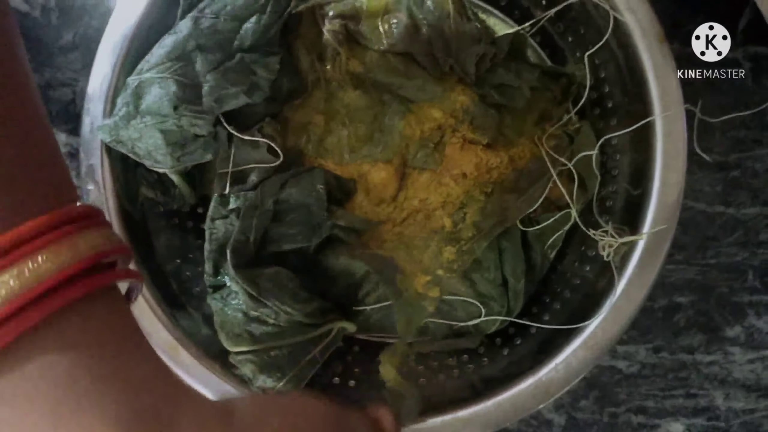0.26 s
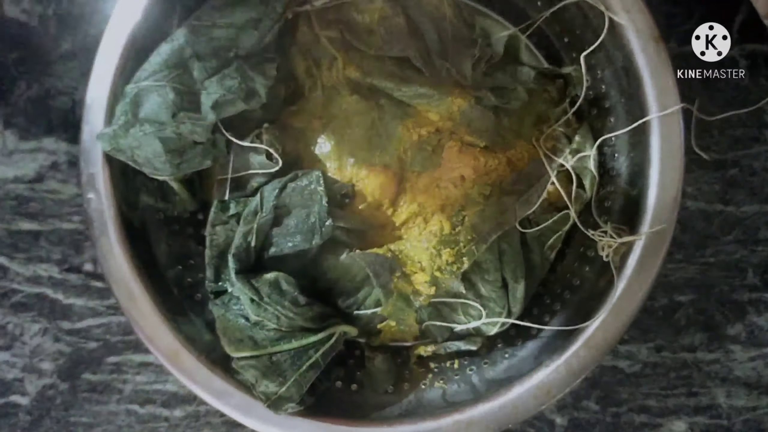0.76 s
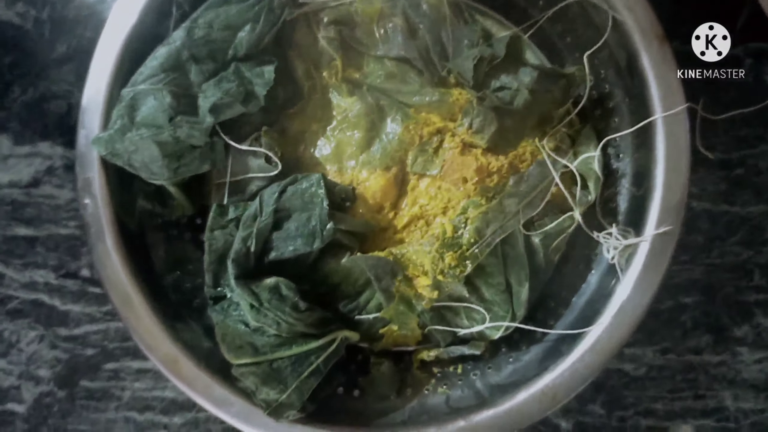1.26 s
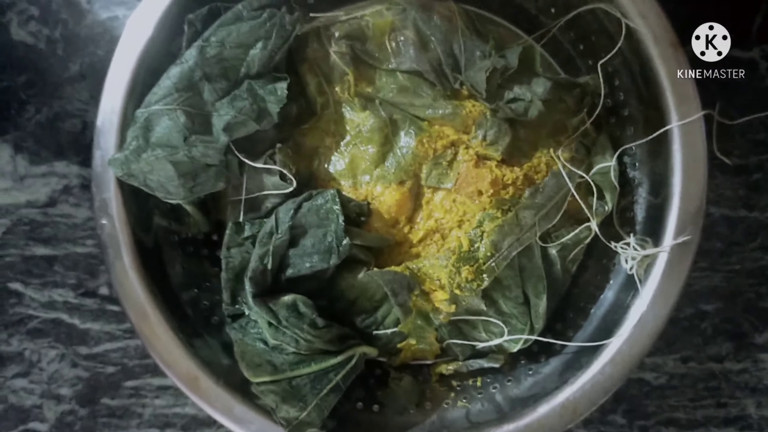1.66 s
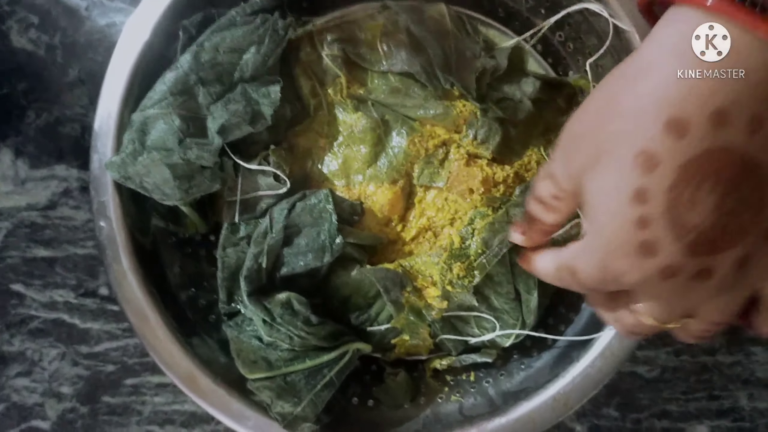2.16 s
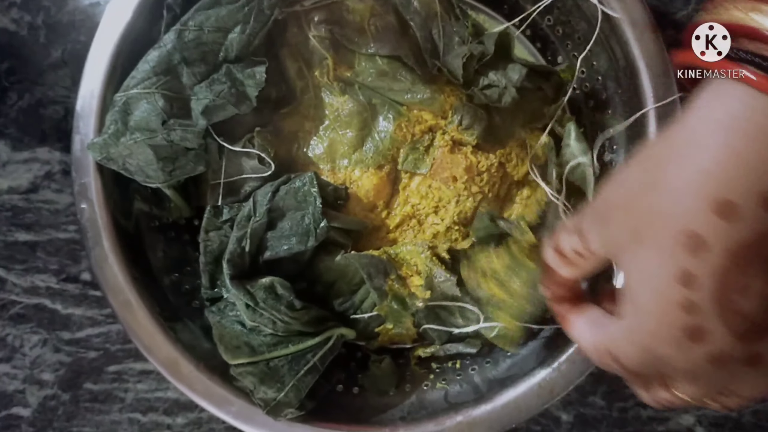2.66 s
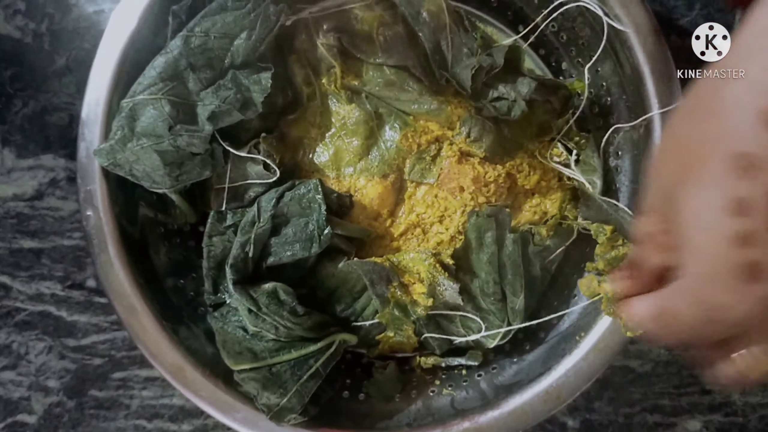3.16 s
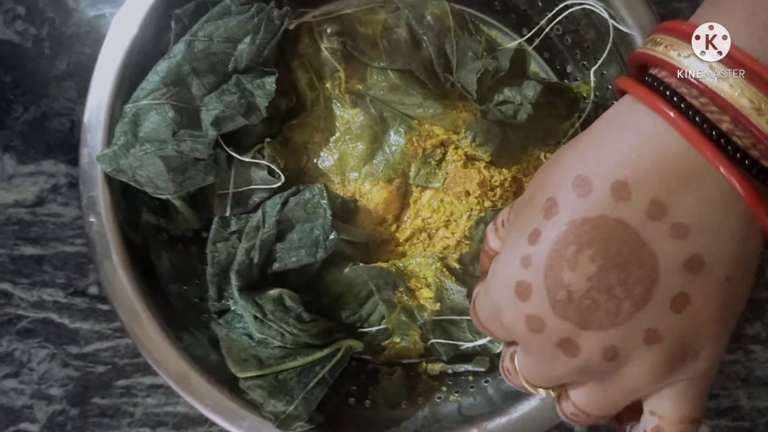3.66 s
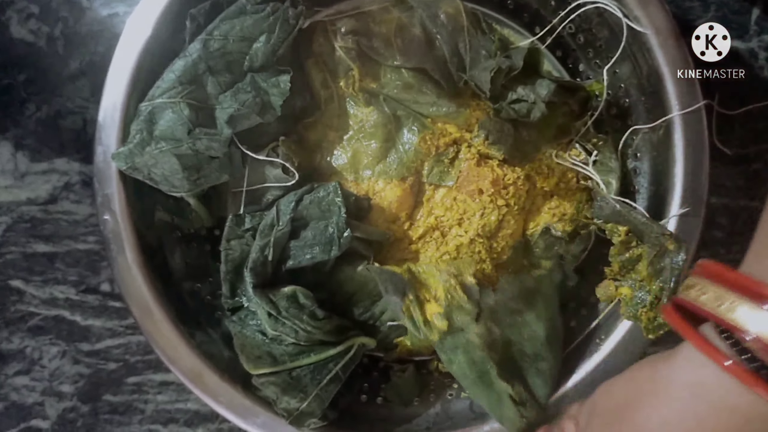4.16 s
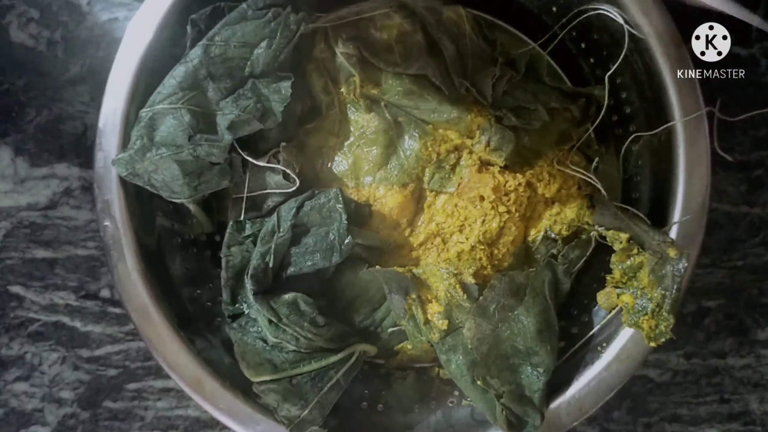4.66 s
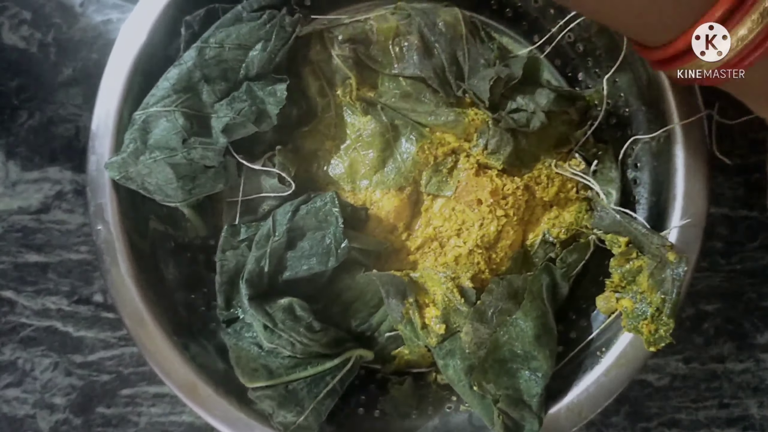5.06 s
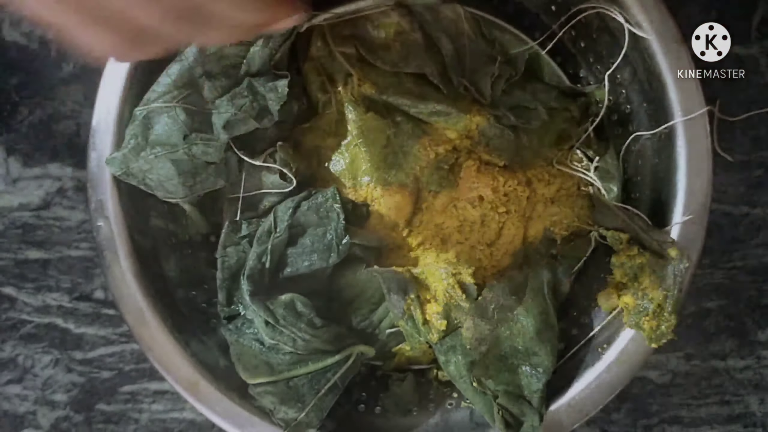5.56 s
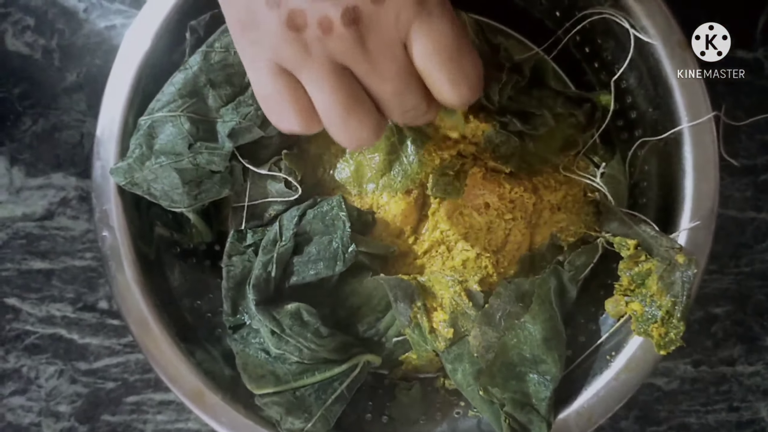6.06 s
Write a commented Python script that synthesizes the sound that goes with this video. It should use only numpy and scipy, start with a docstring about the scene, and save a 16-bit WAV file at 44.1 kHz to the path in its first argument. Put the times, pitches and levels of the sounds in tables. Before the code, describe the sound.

Close by in a quiet kitchen, a hand peels limp wet leaves with soft, jerky rustles and tiny sticky ticks. Thin metal bangles ping, clink and rub at the wrist in bunches, around two seconds and again past four and a half, then clatter hardest at five. A far bird whistles faintly over a low hum and steady low background noise.

```python
"""A quiet kitchen, where a hand peels wet steamed leaves back in a steel colander.
Wrist bangles clink, ping and clack as struck modes and short bursts; they rub as grains feeding damped modes,
and slide along the arm as swelling noise. The leaves rustle and tick in coloured grains and filtered bursts.
A low hum of four wavering tones, a steady noise floor and a far bird's gliding, echoing whistles lie behind."""
import sys
import numpy as np
from scipy import signal
from scipy.fft import rfft, irfft
from scipy.io import wavfile

SR = 44100
rng = np.random.default_rng(int(sys.argv[2]) if len(sys.argv) > 2 else 0)


def bounce(signal):
    """Save signal as a 16-bit WAV file at the path given by the first command-line argument."""
    frames = np.transpose(np.atleast_2d(signal))
    limited = np.clip(frames, -1, 1)
    pcm = np.round(limited * 32767).astype(np.int16)
    wavfile.write(sys.argv[1], SR, pcm)


N = 278712
TIME = np.arange(N) / SR  # seconds


# Bangles touch: (time [s], ring level before mode trims [dB], high over low modes [dB], contact tick level [dB])
BANGLE_TOUCHES = [(1.1942, -65, 1, -82), (1.3452, -54.5, 19, -48), (1.683, -60.5, 16, -80),
                  (1.7852, -44, 7, -52), (1.7917, -44, 12, -53), (1.8105, -52, 10, -65),
                  (1.8309, -47.5, 25.5, -41.5), (2.0379, -46, 16, -41.5), (2.0587, -65, 32, -44),
                  (2.118, -62, 18, -70), (2.135, -62.5, -4, -58), (2.178, -59.5, 28, -73),
                  (2.9605, -57, 8, -58), (3.2244, -60.5, 14, -79), (4.0532, -66, 2, -56),
                  (4.1728, -60.5, 13, -57), (4.5128, -51.5, 21, -82), (4.6178, -43.5, 18, -47),
                  (4.6375, -53, 13, -39), (4.6533, -51, 28, -51), (4.7492, -54.5, 40.5, -50),
                  (4.8461, -61.5, 13, -48.5)]
# Modes of the bangle stack before damping: (frequency [Hz], relative level [dB], free t60 [s])
STACK_MODES = [(1620, -5, .2), (1920, -5, .12), (2250, -9, .06), (2620, -9, .06), (4575, -2, .16),
               (5520, -2, .16), (8400, -13, .06), (8740, -4, .14), (10545, -1, .13), (10655, -8, .22),
               (12100, -16, .07), (13730, -13, .1), (13975, 0, .13), (14060, -5, .1), (14340, -9, .07),
               (14790, -12, .12)]
# Colour of the contact tick: (frequency [Hz], level [dB])
TICK_COLOUR = [(800, -44), (2000, 10.5), (3000, 5), (6500, -6), (8300, 10.5), (12000, 10.5), (15000, -29),
               (16500, -28)]


def clinks(body_db=-1.0, low_db=0.5, middle_db=3.5, tick_t60=0.033, scatter_db=5.0, grip=0.49):
    """Each touch and its rebound ring the stack, damped by the wrist; brightness tilts high against low modes."""
    rebound_s, rebound_loss_db = 0.011, 4.5
    rings, ticks = np.zeros(N), np.zeros(N)
    for s, level, bright, tick in BANGLE_TOUCHES:
        # trims for modes below 4 kHz, 4-7 kHz, 7-12 kHz and above
        group_db = [body_db - bright / 2, low_db - bright / 2, middle_db, bright / 2]
        for delay, loss in (0, 0), (rebound_s, rebound_loss_db):
            for hz, db, t60 in STACK_MODES:
                group = np.searchsorted([4000, 7000, 12000], hz)
                strength = level - loss + group_db[group] + db
                scattered = strength + scatter_db * rng.normal()
                detune = 1 + 0.0026 * rng.normal()  # each mode's pitch varies slightly from touch to touch
                add(rings, s + delay, from_db(scattered) * ring(hz * detune, t60 * grip))
            add(ticks, s + delay, from_db(tick - loss) * burst(tick_t60))
    return rings + coloured(ticks, TICK_COLOUR)


# A thin bangle rings: (time [s], pitch [Hz], level before mode levels [dB], lowest mode level [dB])
THIN_BANGLE_PINGS = [(0.775, 10380, -30.5, -62), (2.049, 9600, -41, -81), (2.060, 9480, -28.5, -77),
                     (3.310, 9394, -40, -70), (3.322, 9420, -31, -51), (4.541, 9640, -22.5, -67)]
# Its upper modes: (multiple of the pitch [ratio], relative level [dB], t60 [s])
THIN_BANGLE_MODES = [(0.996, -5.5, 0.046), (1.002, -44.5, 0.4), (1.599, -10, 0.076)]


def pings(level_db=0.0, lowest_t60=0.1):
    """A thin bangle swings clear of the skin and rings freely in a few decaying modes."""
    out = np.zeros(N)
    for s, pitch, peak, lowest in THIN_BANGLE_PINGS:
        add(out, s, from_db(lowest) * ring(pitch * .528, lowest_t60))
        for multiple, db, t60 in THIN_BANGLE_MODES:
            add(out, s, from_db(peak + db + level_db) * ring(pitch * multiple, t60))
    return out


# Bangles knocked hard: (time [s], crack level before trim [dB], knock level before trim [dB], crack t60 [s])
BANGLE_CLACKS = [(0.774, -37, -53.5, 0.06), (1.3448, -29.5, -41, 0.039), (1.5276, -40.5, -49.5, 0.015),
                 (1.8306, -22, -63, 0.012), (2.057, -23, -56.5, 0.012), (3.312, -38, -55, 0.019),
                 (3.321, -35.5, -49, 0.027), (4.295, -24, -39, 0.014), (4.54, -31, -51, 0.016),
                 (4.9841, -14.5, -31.5, 0.015), (4.995, -10, -30, 0.018), (5.0086, -11, -35.5, 0.006),
                 (5.1065, -17, -43, 0.018), (5.1207, -22, -50, 0.024), (5.1263, -17.5, -29.5, 0.027)]
# Colour of the dry crack: (frequency [Hz], level [dB])
CRACK_COLOUR = [(2500, -22), (4000, -10), (5700, -3), (6800, -4), (8200, 0), (9500, -4), (12500, -6),
                (15000, -2), (16500, -10)]
# Colour of the low knock: (frequency [Hz], level [dB])
KNOCK_COLOUR = [(150, -40), (450, -18), (700, -19), (1500, -15.5), (2200, -1), (3000, -4.5), (4000, -10),
                (8000, -48)]


def clacks(crack_db=-11.0, knock_db=-1.0, knock_t60=0.025, impact=1.0):
    """Bangles pressed together cannot ring: a dry crack over a short knock."""
    cracks, knocks = np.zeros(N), np.zeros(N)
    for s, peak, knock, length in BANGLE_CLACKS:
        crack_gain = from_db(peak + crack_db)
        add(cracks, s, crack_gain * burst(length))
        add(cracks, s, crack_gain * np.array([impact]))  # the instant of first contact
        add(knocks, s, from_db(knock + knock_db) * burst(knock_t60))
    return coloured(cracks, CRACK_COLOUR) + coloured(knocks, KNOCK_COLOUR)


# Bangles rub as the wrist turns: (peak time [s], level before mix trims [dB], 20 dB rise [s], 20 dB fall [s])
WRIST_TURNS = [(1.32, -55, 0.085, 0.045), (1.695, -47, 0.066, 0.092), (1.795, -34, 0.055, 0.049),
               (2.04, -43.5, 0.093, 0.049), (2.2, -47.5, 0.097, 0.11), (2.445, -52, .04, 0.075),
               (2.705, -59, .03, 0.029), (2.98, -51.5, 0.035, 0.024), (3.15, -56, .02, .05),
               (3.26, -54.5, .07, 0.16), (3.42, -57.5, .02, 0.072), (3.86, -60, .08, 0.06),
               (4.52, -53, .04, .04), (4.765, -51.5, 0.017, 0.035), (4.89, -58, 0.12, 0.15)]
# Colour of the rubbing contacts: (frequency [Hz], level [dB])
RUB_COLOUR = [(1500, -16.5), (2600, -16), (4500, -13.5), (5600, -20.5), (8700, -3.5), (10500, -15.5),
              (13200, -2), (13900, 1.5), (14500, 5.5), (15400, 0.5)]


def rubbing(ring_db=-4.0, scratch_db=-21.5, catch_db=-2.5, shift_db=2.5):
    """Rubbing rims feed tiny contacts and rarer catches into damped modes, which shift as the contact moves."""
    stream = grains(per_s=1500, spread_db=3)
    catches = grains(per_s=200, spread_db=2.5)
    friction = stream + from_db(catch_db) * catches
    contacts = coloured(swells(WRIST_TURNS) * friction, RUB_COLOUR)
    # tightly damped, each mode decays three times sooner
    modes = [from_db(db) * ring(hz, t60 / 3) for hz, db, t60 in STACK_MODES]
    rings = np.zeros(N)
    for mode in modes:
        shift = from_db(shift_db * drift(per_s=30))
        rings += shift * signal.oaconvolve(contacts, mode)[:N]
    rings /= np.linalg.norm(modes)
    return from_db(ring_db) * rings + from_db(scratch_db) * contacts


# The stack slips along the forearm: (peak time [s], level [dB], 20 dB rise [s], 20 dB fall [s])
FOREARM_SLIPS = [(4.997, -42, 0.0068, 0.026), (5.078, -37.5, 0.0033, 0.0057), (5.128, -44, 0.085, 0.12)]
# Skin hisses under the last slip: (peak time [s], level [dB], 20 dB rise [s], 20 dB fall [s])
SKIN_HISS = [(5.136, -49, 0.035, 0.3)]
# Colour of the hollow swish: (frequency [Hz], level [dB])
SWISH_COLOUR = [(240, -29), (400, -14), (469, -27), (689, -1), (1210, 1), (1290, 0), (1390, 1), (1910, -10),
                (2420, 1), (6000, -58), (7800, -40), (13200, -120)]
# Colour of the skin hiss: (frequency [Hz], level [dB])
HISS_COLOUR = [(1760, -18), (3000, -6.5), (6090, -21.5), (6810, -36), (8340, -14), (11700, -16),
               (14900, -14), (16000, -11)]


def sliding():
    """The stack slips along the arm: swelling noise makes a hollow swish and a fading hiss."""
    swish = swells(FOREARM_SLIPS) * noise(SWISH_COLOUR)
    hiss = swells(SKIN_HISS) * noise(HISS_COLOUR)
    return swish + hiss


# Short rustling strokes of the hand and arm, most of them pulling at a leaf:
# (peak time [s], base rustle level [dB], 20 dB rise [s], 20 dB fall [s], wet crackle over base rustle [dB])
RUSTLE_STROKES = [(0.0, -59.5, .1, 0.22, -5), (0.55, -70.5, 1.3, 1, -26), (1.41, -70, 0.11, 0.8, -12),
                  (1.95, -71.5, 1.3, 0.99, 0), (2.66, -63.5, 0.52, 0.41, -8.5), (2.97, -66, 0.41, 0.11, 0),
                  (3.61, -63, 0.36, 0.46, -3.5), (3.9, -61, .35, .12, -8), (3.999, -61, 0.034, 0.25, 0.5),
                  (4.72, -65.5, 0.39, 0.91, 6), (5.31, -59.5, 0.2, 0.21, -3), (6.12, -70.5, 0.22, 1, 3)]
# A sticky leaf lets go: (time [s], level before band filter [dB], frequency that places the band [Hz])
STICKY_TICKS = [(1.408, -44, 2210), (2.022, -38, 8800), (2.473, -48, 8800), (4.055, -38.5, 5800),
                (4.23, -47, 3500), (5.944, -49.5, 6500), (6.013, -46.5, 8200), (6.071, -40, 5940),
                (6.099, -41.5, 4300), (6.195, -43, 7960), (6.22, -42.5, 5500)]
# Colour of the dragging leaves: (frequency [Hz], level [dB])
RUSTLE_COLOUR = [(240, -32.5), (400, -6.5), (469, -6.5), (754, -14.5), (1150, -5), (2260, 0), (2420, 1),
                 (3330, -12), (4730, -17), (6000, -43), (7800, -48), (13200, -120)]
# Colour of the breaking wet films: (frequency [Hz], level [dB])
CRACKLE_COLOUR = [(1500, -29), (3500, -6.5), (8000, -1.5), (15000, -1.5)]


def leaves(tug_db=-2.5, tug_s=0.049, snap_db=-9.0, snaps_per_s=40, jerk_db=1.5, tick_t60=0.01):
    """Limp leaves rustle in little jerks, each stroke with a short peak; wet films break in ticks and rarer snaps."""
    strokes = swells([(s, db, rise, fall) for s, db, rise, fall, wet in RUSTLE_STROKES])
    peaks = swells([(s, db + tug_db, tug_s, tug_s) for s, db, rise, fall, wet in RUSTLE_STROKES])
    wetness = swells([(s, db + wet, rise, fall) for s, db, rise, fall, wet in RUSTLE_STROKES])
    jerks = from_db(jerk_db * drift(per_s=35))
    drag = np.hypot(strokes, peaks) * jerks
    fibres = grains(per_s=900, spread_db=3.5)
    films = grains(per_s=3500, spread_db=3)
    snaps = from_db(snap_db) * grains(per_s=snaps_per_s, spread_db=4.5)
    rustle = coloured(drag * fibres, RUSTLE_COLOUR)
    crackle = coloured(wetness * (films + snaps), CRACKLE_COLOUR)
    out = rustle + crackle
    for s, peak, hz in STICKY_TICKS:
        band = signal.butter(1, [hz / 2, min(hz * 1.6, SR * .4)], "band", fs=SR)
        add(out, s, from_db(peak) * signal.lfilter(*band, burst(tick_t60)))
    return out


# Swell of the low hum, used relative to its mean: (time [s], level [dB])
HUM_SWELL = [(0, -52.5), (.1, -48.5), (.52, -71), (.8, -57.5), (1.3, -71.5), (1.65, -62.5), (2.3, -67),
             (3.1, -73.5), (6.32, -81.5)]
# Tones of the hum: (centre frequency [Hz], level at the mean of the swell [dB], share of the swell [ratio])
HUM_PARTIALS = [(99.7, -71.5, 0.36), (158.8, -72, 1.3), (189, -64.5, 1.08), (219, -70, .55)]


def hum(waver_hz=3.007, waver_db=4.0):
    """Four low tones swell together, each wavering a little in pitch and level."""
    s, level = np.transpose(HUM_SWELL)
    swing = np.interp(TIME, s, level - level.mean())
    out = np.zeros(N)
    for hz, db, share in HUM_PARTIALS:
        gain = from_db(db + share * swing + waver_db * drift(per_s=3))
        out += gain * sine(hz + waver_hz * drift(per_s=9.1))
    return out


# A far bird whistles, before its reflections:
# (time [s], length [s], start pitch [Hz], middle pitch [Hz], end pitch [Hz], level [dB])
BIRD_WHISTLES = [(1.081, .36, 5200, 5950, 6370, -72), (1.453, 0.15, 4470, 4236, 4640, -63),
                 (3.065, 0.26, 3760, 3500, 3395, -66), (3.128, 0.1, 4180, 4280, 4420, -69),
                 (3.239, .2, 4030, 3920, 3810, -67.5), (3.439, 0.3, 6280, 5660, 4900, -78.5),
                 (5.385, .35, 5400, 5820, 5980, -67.5), (5.698, 0.28, 6110, 5160, 4890, -68.5)]


def bird(quiver_hz=130, t60=0.73):
    """Thin whistles glide along an arc with a fast quiver, arriving only as reflections."""
    out = np.zeros(N)
    for s, length, start, middle, end, db in BIRD_WHISTLES:
        progress = np.linspace(0, 1, int(length * SR))
        arc = np.polyval(np.polyfit([0, .5, 1], [start, middle, end], 2), progress)
        pitch = arc + quiver_hz * drift(per_s=300)[:len(arc)]
        add(out, s, from_db(db) * sine(pitch) * signal.windows.tukey(len(arc), .3))
    return echoes(out, t60)


# Colour of the steady background: (frequency [Hz], relative level [dB])
FLOOR_COLOUR = [(8, 4), (22, -3.5), (38, 0), (50, -7.5), (65, -11), (100, -10.5), (140, -13.5), (200, -12),
                (270, -20), (400, -23.5), (600, -25), (1150, -26), (1750, -28), (2350, -22), (3400, -33.5),
                (6300, -48.5), (8800, -35.5), (13000, -41.5), (15500, -34)]


def floor(level_db=-58.5):
    """Steady noise, strongest in the lows, lies under everything."""
    return from_db(level_db) * noise(FLOOR_COLOUR)


def from_db(db):
    """Decibels to gain."""
    return 10 ** (np.asarray(db) / 20)


def rms_one(x):
    """Scale to unit power."""
    return x / np.sqrt(np.mean(x ** 2) + 1e-20)


def add(track, s, sound):
    """Mix a short sound in at time s."""
    at = int(np.clip(round(s * SR), 0, N - 1))
    track[at:at + len(sound)] += sound[:N - at]


def coloured(x, tone):
    """Minimum-phase filter of unit power gain that follows a (Hz, dB) spectrum."""
    size = 2 ** 13
    hz, db = np.transpose(tone)
    bins_hz = np.arange(size // 2 + 1) * SR / size
    gain = rms_one(from_db(np.interp(np.log(bins_hz + 1), np.log(hz), db)))
    # folding the cepstrum forward makes the filter causal
    cepstrum = irfft(np.log(gain))
    cepstrum[1:size // 2] *= 2
    cepstrum[size // 2 + 1:] = 0
    response = irfft(np.exp(rfft(cepstrum)))
    return signal.oaconvolve(x, response)[:N]


def noise(tone):
    """Smooth noise of a given colour."""
    return coloured(rng.standard_normal(N), tone)


def grains(per_s, spread_db):
    """Random tiny contacts of uneven size; unit power."""
    sizes = from_db(spread_db * np.minimum(rng.exponential(1, N), 4))
    signs = rng.choice([-1, 1], N)
    hits = rng.random(N) < per_s / SR
    return rms_one(sizes * signs * hits)


def fade(t60):
    """Half a second of exponential decay, losing 60 dB every t60 seconds."""
    return np.exp(-np.log(1000) * TIME[:SR // 2] / max(t60, 1e-3))


def burst(t60):
    """A dense rattle of random signs that decays at once."""
    return rng.choice([-1, 1], SR // 2) * fade(t60)


def ring(hz, t60):
    """One struck mode: a decaying sine, its sign drawn at random."""
    return rng.choice([-1, 1]) * np.sin(2 * np.pi * hz * TIME[:SR // 2]) * fade(t60)


def echoes(x, t60):
    """Diffuse reflections of unit power gain that build up briefly, then decay."""
    tail = burst(t60) * (1 - fade(0.039))
    return signal.oaconvolve(x, tail / np.linalg.norm(tail))[:N]


def swells(rows):
    """Gain of movements that build and die away; rise and fall times span 20 dB."""
    power = 0
    for s, db, rise, fall in rows:
        away = np.maximum((s - TIME) / max(rise, 1e-3), (TIME - s) / max(fall, 1e-3))
        power = power + from_db(db - 20 * np.minimum(away, 6)) ** 2
    return np.sqrt(power)


def drift(per_s):
    """Random wander of about unit size, in straight lines between per_s points a second."""
    knots = np.arange(0, N / SR, 1 / per_s)
    return np.interp(TIME, knots, rng.standard_normal(N)[:len(knots)])


def sine(hz):
    """A tone that follows a pitch curve."""
    return np.sin(2 * np.pi * np.cumsum(hz) / SR)


def scene(room_db=-12.0, room_t60=0.42):
    """Wrist and leaves close by, with the kitchen around them."""
    near = clinks() + pings() + clacks() + rubbing() + sliding() + leaves()
    room = from_db(room_db) * echoes(near, room_t60)
    background = hum() + bird() + floor()
    return (near + room + background)[None]


def record(dry):
    """A steep elliptic low-pass cuts the top."""
    cutoff_hz = 15750
    lowpass = signal.ellip(10, .3, 70, cutoff_hz, fs=SR, output="sos")  # 0.3 dB ripple, 70 dB rejection
    return signal.sosfilt(lowpass, dry)


dry = scene()
out = record(dry)
bounce(out)
```